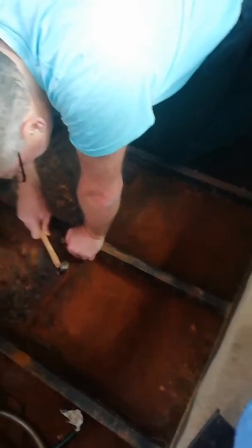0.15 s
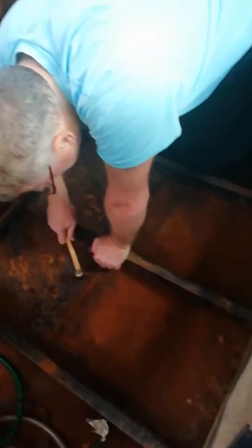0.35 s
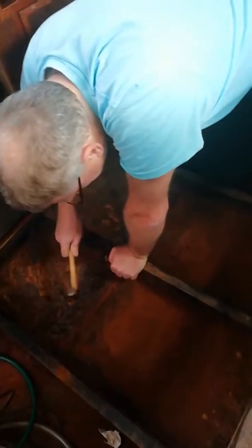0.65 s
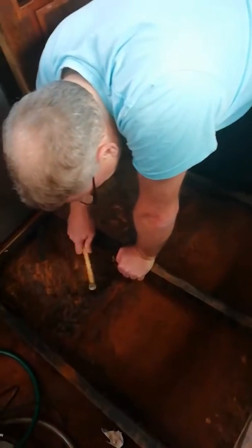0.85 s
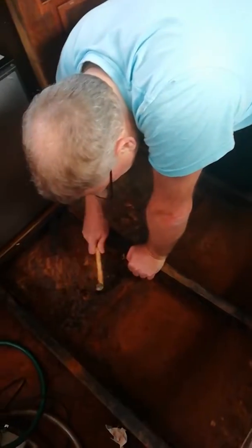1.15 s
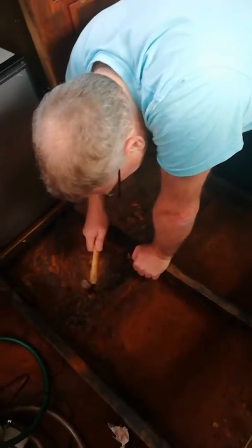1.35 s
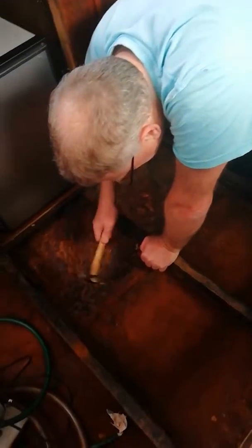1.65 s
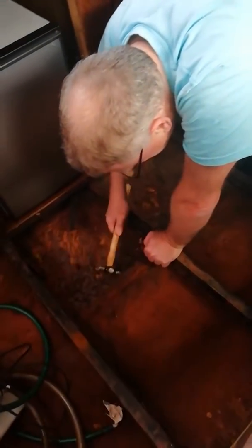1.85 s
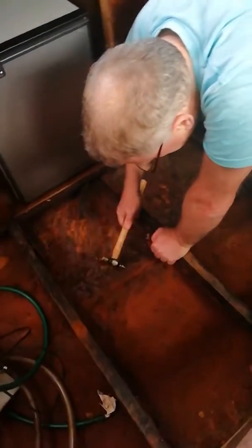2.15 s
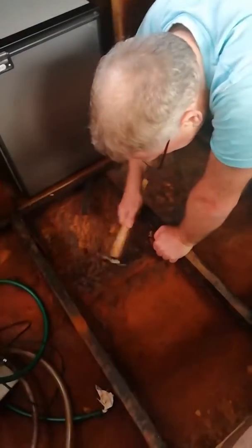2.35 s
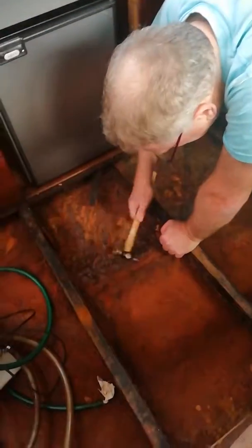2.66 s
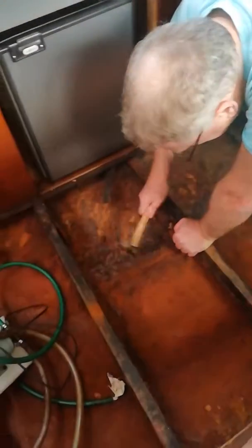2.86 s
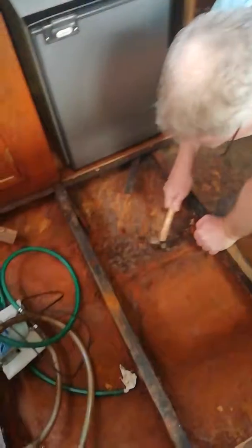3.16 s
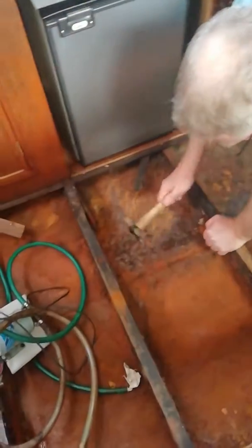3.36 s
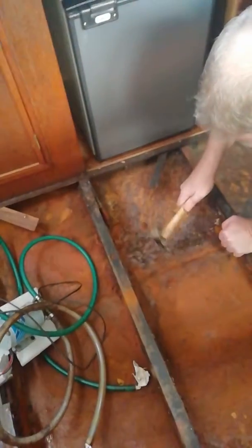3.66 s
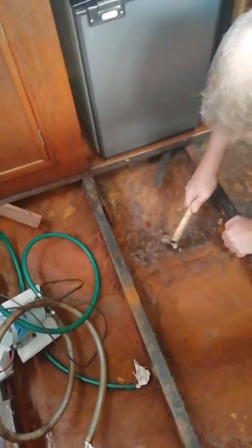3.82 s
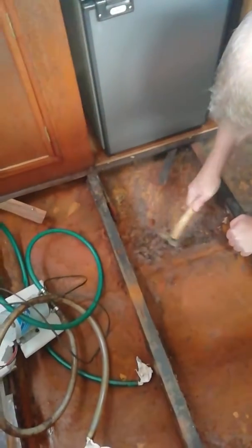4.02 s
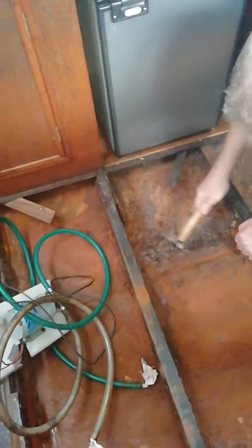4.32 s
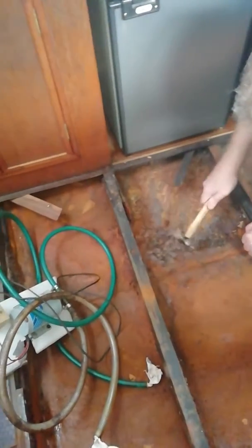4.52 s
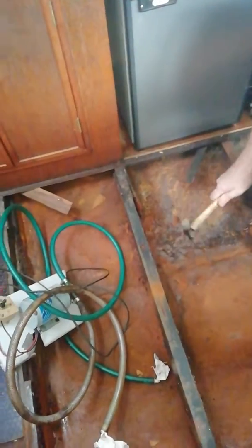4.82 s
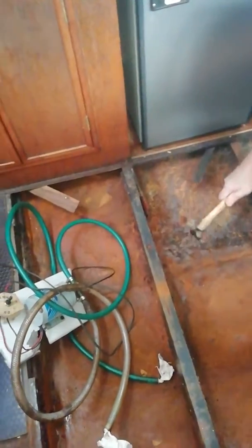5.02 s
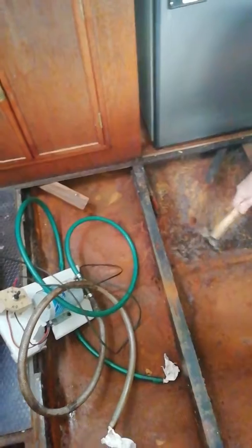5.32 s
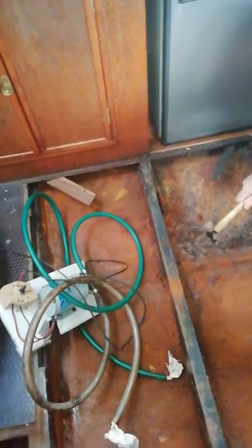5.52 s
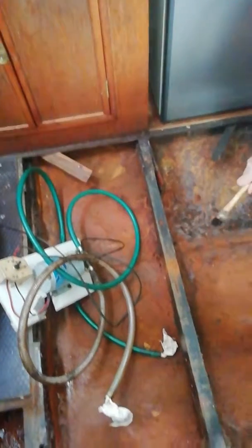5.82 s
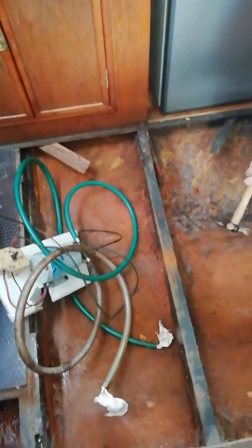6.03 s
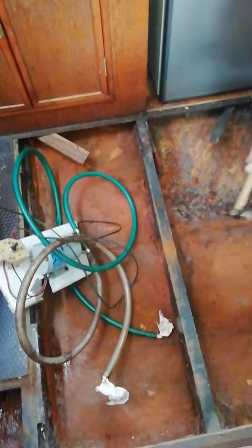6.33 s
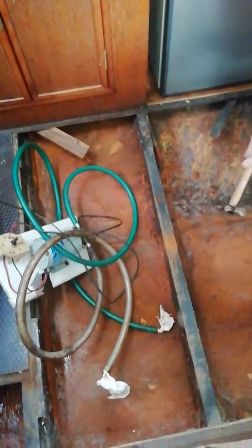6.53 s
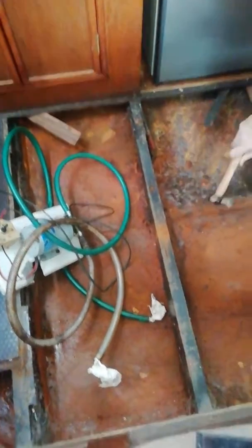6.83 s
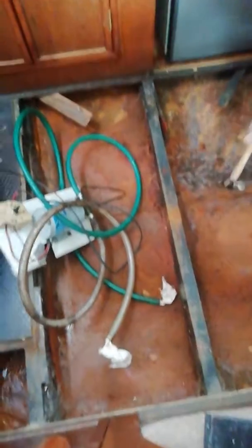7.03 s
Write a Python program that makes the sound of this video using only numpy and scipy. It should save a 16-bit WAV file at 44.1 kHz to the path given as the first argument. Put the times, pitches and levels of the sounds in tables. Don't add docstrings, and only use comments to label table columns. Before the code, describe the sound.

A small hammer chips rust from steel plating inside a boat cabin, heard close on a phone. A faint tail of an earlier blow and crumbling grit open it; the first strike lands at 0.3 s, followed by a coarse crunch and small pings around 0.4-0.5 s. After a gap, blows resume at 0.85 and 1.2 s, then fall about every 0.3 s, each a crack, short clang and dull hull thud. Grit scrapes and sprays between them, with bright flake ticks near 1.1 and 2.0 s. A hard blow stands out at 2.4 s. From 3 to 4.7 s hits are mostly softer, some with a high thin ring and scattering rust. From 4.9 s they grow firmer and cleaner, with little debris, peaking at 6.2, 6.75 and 7.0 s; a chip skitters around 6.5 s. Low rumble and quiet air lie underneath.

```python
import sys
import numpy as np
from scipy import signal
from scipy.io import wavfile
from scipy.ndimage import uniform_filter1d

SR = 44100
rng = np.random.default_rng(int(sys.argv[2]) if len(sys.argv) > 2 else 0)


def convert_level_to_amplitude(level_db):
    exponent = np.asarray(level_db, float) / 20
    return 10 ** exponent


def to_wav(sig):
    pcm = np.clip(np.atleast_2d(sig), -1, 1) * 32767
    pcm = np.round(pcm).astype(np.int16)
    wavfile.write(sys.argv[1], SR, pcm.T)


N = 316638


def rms_one(x):
    return x / np.sqrt(np.mean(x ** 2) + 1e-20)


def at_hz(points, hz):
    curve_hz, values = np.transpose(points)
    return np.interp(np.log(hz), np.log(curve_hz), values)


def clicks(seconds, sizes):
    train = np.full(N, 1e-18)
    places = np.round(np.asarray(seconds) * SR).astype(int)
    train[np.clip(places, 0, N - 1)] = sizes
    return train


def ring(train, hz, t60):
    r, w = convert_level_to_amplitude(-60 / (t60 * SR)), 2 * np.pi * hz / SR
    return signal.lfilter([0, np.sin(w)], [1, -2 * r * np.cos(w), r * r], train)


def die(train, t60):
    return signal.lfilter([1], [1, -convert_level_to_amplitude(-60 / (t60 * SR))], train)


# (frequency [Hz], correlation [-1..1])
LIKENESS = [(60, 0.97), (130, 1), (290, 0.85), (640, -0.36), (1410, 0.24), (3100, 0.011), (6820, -0.048),
            (15000, 0.034)]
# (frequency [Hz], left minus right [dB])
LEAN = [(60, 0.5), (110, 2), (200, -1.5), (380, -2.5), (700, 7), (1290, -1.5), (2380, -1), (4400, 0.5),
        (8120, 1.5), (15000, -2.5)]


def stereo_bands():
    edges = 30 * 2 ** np.arange(0, 9.2, 1 / 3)
    white = rng.standard_normal((2, 2, N))
    for k, (low, high) in enumerate(zip(edges, edges[1:])):
        band = signal.butter(2, [low, high], "band", fs=SR, output="sos")
        mid, side = signal.sosfilt(band, white[k % 2])
        hz = np.sqrt(low * high)
        alike = np.clip(at_hz(LIKENESS, hz), -1, 1)
        lean = convert_level_to_amplitude(at_hz(LEAN, hz) / 2 * np.array([[1], [-1]]))
        yield hz, lean * (np.sqrt(1 + alike) * mid + np.sqrt(1 - alike) * side * [[1], [-1]])


EARLIER_BLOW = [
    (0, -33, 6.4, 7, -8),
]
# (time [s], plate peak [dB], then thud, body and crack [dB over the plate])
BLOWS = [(0.289, -13, -4.5, 8, -6), (0.8446, -15, -6.5, -5, 2), (1.1992, -11.5, -6, -0.5, -6.5),
         (1.5355, -10.5, -7.5, -2, -4.5), (1.8384, -12.5, -4, -2.5, -9), (2.1191, -17.5, -2.5, -3, -1.5),
         (2.405, -5, -19.5, -13.5, -11), (2.678, -15.5, -4, 5.5, -8.5), (2.9348, -12, -7.5, -0.5, -9),
         (3.1711, -18.5, -1.5, -0.5, -13), (3.5314, -12.5, -3.5, -2, -2.5), (3.7992, -21, 2.5, 2.5, 3),
         (4.0648, -15, -9, -10, 3), (4.361, -14.5, -7, -18, -10), (4.6678, -18.5, 2, -1, -6.5),
         (4.9109, -8, -9, -11.5, -12.5), (5.1376, -9, -10, -12, -7.5), (5.3666, -8.5, -15.5, -15, -8.5),
         (5.6331, -8, -6.5, -6, -8.5), (5.928, -16, -4.5, -11.5, -5.5), (6.228, -3.5, -17, -14.5, -14),
         (6.4833, -11.5, -18, -11, -8.5), (6.7451, 1, -22, -17.5, -10), (7.016, -0.5, -25, -14.5, -14.5)]


def strike_db(hz):
    strike_hz = [230, 750, 1900, 5000, 11000]
    s, plate, thud, body, crack = np.transpose(EARLIER_BLOW + BLOWS)
    splash = crack - 0.65 * np.maximum(plate, -20)
    colours = np.stack([thud, body, 0 * plate, crack, splash], axis=1)
    colours = colours - colours.mean(axis=0)
    return plate + np.array([np.interp(np.log(hz), np.log(strike_hz), row) for row in colours])


# (frequency [Hz], level [dB per Hz])
PLATE = [(50, -74.5), (85, -30.5), (150, -8.5), (280, -1.5), (540, -5), (1100, -5.5), (1750, -12),
         (2800, -16.5), (4200, -22), (6500, -27), (9000, -25.5), (12000, -33), (16500, -33)]
# (frequency [Hz], t60 [s])
PLATE_T60 = [(60, 0.2), (160, 0.33), (420, 0.21), (1100, .17), (2900, .14), (7700, 0.15), (14000, 0.047)]
# (frequency [Hz], level [dB per Hz])
AIR = [(200, -9), (300, -3.5), (500, -7.5), (1500, -4.5), (2400, -13.5), (3000, -7.5), (6500, -17.5),
       (9000, -19), (12000, -16), (16500, -12)]


def plate_and_air(seconds):
    air_db = -69.5
    plate, air = 0, 0
    for hz, band in stereo_bands():
        blow_db = strike_db(hz) + at_hz(PLATE, hz) + rng.normal(0, 1.5, len(seconds))
        train = clicks(seconds, convert_level_to_amplitude(blow_db))
        t60 = at_hz(PLATE_T60, hz)
        swell = die(train, t60) - die(train, 12.0 / hz)
        crack = convert_level_to_amplitude(3) * np.clip(hz / 1500, 0, 1) * die(train, .018)
        long_tail = convert_level_to_amplitude(-33.5) * die(train, 1.3 * t60)
        plate = plate + (crack + swell + long_tail) * band
        air = air + convert_level_to_amplitude(at_hz(AIR, hz)) * band
    return convert_level_to_amplitude(14) * plate + convert_level_to_amplitude(air_db) * rms_one(air)


def struck(modes, seconds, level_db, spread_db):
    out = np.zeros((2, N))
    for hz, mode_db, t60 in modes:
        chance = rng.normal(0, 1, (len(seconds), 2))
        sizes = convert_level_to_amplitude(level_db(hz) + mode_db + spread_db * chance[:, 0]) * np.sign(chance[:, 1])
        tone = ring(clicks(seconds, sizes), hz, t60)
        phase = np.arccos(np.clip(at_hz(LIKENESS, hz), -1, 1))
        lag = int(phase / (2 * np.pi * hz) * SR)
        out += [tone, np.roll(tone, lag)]
    return out


# (frequency [Hz], level [dB], t60 [s])
HULL = [(86.4, -17, 0.54), (124.74, -12.5, 0.4), (156.5, -11, 0.12), (214.3, 2.5, 0.15), (274.3, -7, 0.41),
        (303, -8.5, 0.28), (361.4, -1, 0.13), (400, -4.5, .24), (472, -1.5, 0.15), (549, -4.5, .18),
        (686, -11, .15), (910, -13, .13), (1160, -11, .13), (1380, -34, 0.05), (1606, -15, 0.24),
        (1803, -5, 0.11)]


def hull_thud(seconds):
    thud = struck(HULL, seconds, lambda hz: strike_db(hz) - 7, spread_db=1.78)
    return signal.sosfilt(signal.butter(3, 85, "high", fs=SR, output="sos"), thud)


# (time [s], level [dB])
RUMBLE = [(0.0, -53.5), (0.42, -58.5), (0.6, -71.5), (0.86, -66.5), (1.04, -49), (2.56, -55.5),
          (3.16, -50.5), (3.38, -63), (3.56, -61.5), (3.72, -51.5), (4.5, -60.5), (4.9, -50), (6.2, -60.5),
          (7.18, -55)]


def rumble():
    s, level_db = np.transpose(RUMBLE)
    low_band = signal.butter(2, [28, 130], "band", fs=SR, output="sos")
    dull = signal.sosfilt(low_band, rng.standard_normal(N))
    return convert_level_to_amplitude(np.interp(np.arange(N) / SR, s, level_db)) * rms_one(dull)


# (time [s], grit level [dB], time to fall 30 dB [s], coarseness [dB])
SHOWERS = [(0.0, -39.5, 0.16, 2.5), (.134, -38, 0.04, 5), (.33, -39.5, .2, 1), (.4, -32.5, 0.1571, 7.5),
           (.5, -34, 0.1048, 8.5), (.88, -40, 0.18, 8.5), (1.14, -30.5, 0.19, 1.5), (1.25, -43, 0.17, 2),
           (1.468, -36, 0.17, 3), (1.537, -20.5, 0.02, -16), (1.88, -32, 0.0245, 4), (2.17, -43, 0.09, 6.5),
           (2.315, -45, 0.18, -12), (3.14, -53.5, 0.22, 0), (3.2, -36.5, 0.0266, 12.5),
           (3.58, -53, 0.28, 3), (3.85, -35.5, 0.04, 10), (4.135, -38, 0.0355, 12.5),
           (4.38, -35.5, 0.22, 8.5), (4.572, -60, -0.16, -6.5), (5.61, -48.5, -0.08, -4.5),
           (5.68, -49, 0.07, 18.5), (5.758, -55, 0.17, 6.5), (5.98, -54, 0.17, 6), (6.13, -60, 0.5, -5),
           (1.705, -45, 1, -8), (6.52, -41.5, 0.17, 7.5), (6.82, -52, 0.1, -9), (.94, -36, 0.13, -4.5),
           (7.093, -34, 0.22, -6)]
DRAGS = [(.47, -39, .1, 8.5), (.99, -38.5, 0.08, -1), (1.19, -31, 0.04, -7.5), (1.74, -47.5, 0.02, -3.5),
         (2.0, -31.5, 0.13, -8.5), (2.1, -42.5, 0.13, -17), (2.586, -66.5, 0.6, -7),
         (2.75, -48.5, 0.14, -5), (6.39, -59.5, 0.5, -10), (6.44, -48, 0.25, -8.5), (6.726, -48, 0.07, -12),
         (6.926, -56, .15, -7)]
# (frequency [Hz], level [dB per Hz])
GRIT = [(150, -37), (300, -1.5), (500, -8.5), (1000, -6), (1600, -11), (3000, -14.5), (6000, -13.5),
        (9000, -9.5), (12000, -14.5), (16500, -28)]


def grit():
    t, fine, coarse = np.arange(N) / SR, np.zeros(N), np.zeros(N)
    for rows, rise_db_per_s in [(SHOWERS, 2000), (DRAGS, 350)]:
        for s, level_db, fall_s, coarse_db in rows:
            near = slice(max(int((s - .3) * SR), 0), int((s + 3 * fall_s) * SR))
            after = t[near] - s
            shape = convert_level_to_amplitude(level_db - np.maximum(-rise_db_per_s * after, 30 * after / fall_s))
            fine[near] += shape
            coarse[near] += shape * convert_level_to_amplitude(coarse_db)
    sizes = convert_level_to_amplitude(4.1 * np.minimum(rng.exponential(1, N), 5)) * rng.choice([-1, 1], N)
    born = rng.random(N) < 2500 / SR
    dealt = rng.integers(0, 24, N)
    low, high = np.zeros((2, N))
    for k, hz in enumerate(np.geomspace(200, 15500, 24)):
        train = sizes * born * (dealt == k) + 1e-18
        grains = convert_level_to_amplitude(at_hz(GRIT, hz)) * hz * ring(train, hz, 4.8 / hz)
        if hz < 4000:
            low = low + grains
        else:
            high = high + grains
    scale = convert_level_to_amplitude(-7.5) / np.std(high)
    return scale * (fine * high + coarse * low)


# (time [s], peak [dB], pitch [Hz])
FLAKES = [(0.1293, -19.5, 1630), (1.1437, -8, 4020), (1.4682, -25, 1870), (1.9844, -21, 7390),
          (1.999, -9, 8150), (2.3161, -37.5, 7360), (2.9098, -31, 1740), (3.1445, -27, 1510),
          (4.1352, -13, 5380), (4.573, -37, 2670), (5.5575, -40, 7200), (5.6096, -29.5, 2480),
          (5.7573, -39, 3780), (6.1295, -44, 7420), (6.3809, -34, 2290), (6.4184, -16.5, 6840),
          (6.6085, -21, 6700), (6.6807, -28.5, 6440), (6.706, -17.5, 2660), (6.934, -36.5, 6460),
          (7.0936, -14, 7420)]


def flakes():
    out = np.zeros(N)
    for s, level_db, hz in FLAKES:
        tick = clicks([s], convert_level_to_amplitude(level_db))
        out += convert_level_to_amplitude(-13.5) * ring(tick, hz, 10.0 / hz) + convert_level_to_amplitude(-6.5) * ring(tick, 7000, 0.0017)
    return out


HEAD_HZ = [5330, 7450, 11280, 11345, 13510]
# (level [dB], t60 [s])
HEAD_RING = [(-20, .12), (-8, .1), (3, .22), (-2, .12), (-12, .1)]
HEAD_DB = [-70, -60, -46, -56, -46, -54, -50, -50, -37, -36, -44, -58, -43, -29, -44, -56, -54, -60, -60,
           -62, -62, -40, -58, -46, -56]


def hammer_head(seconds):
    modes = [(hz, *ringing) for hz, ringing in zip(HEAD_HZ, HEAD_RING)]
    return struck(modes, seconds, lambda hz: np.array(HEAD_DB), spread_db=1.5)


# (upper clank level [dB], upper clank pitch [Hz], lower clank level [dB], lower clank pitch [Hz])
CLANKS = [(-18, 2900, -21, 1786), (-26, 8000, -15.5, 1710), (-15, 2600, -9.5, 1717), (-17, 3140, -22, 2700),
          (-18.5, 4000, -14.5, 1680), (-25.5, 2000, -21.5, 1776), (-19, 2654, -9, 1786),
          (-25.5, 6200, -25, 2100), (-18, 3610, -13, 1700), (-52, 2800, -21, 1380),
          (-11.5, 4100, -17, 1726), (-10, 3420, -33, 1100), (-12, 3550, -19, 2100),
          (-19, 2970, -23.5, 1500), (-36, 4500, -28, 1500), (-11, 2600, -14.5, 1733),
          (-14, 2320, -17, 1710), (-25.5, 3750, -23, 2100), (-11.5, 4700, -33, 1380),
          (-22, 3000, -20, 1792), (-11, 4900, -9.5, 1807), (-15, 5900, -15, 1895),
          (-15.5, 3090, -13.5, 2200), (-10, 3400, -7, 1770)]


def clank():
    out, t = np.zeros((2, N + SR)), np.arange(SR // 5) / SR
    weights = np.array([[1, 0.21, 0.48], [1.0, -1.4, 0.36]])
    for (s, *_), (upper_db, upper_hz, lower_db, lower_hz) in zip(BLOWS, CLANKS):
        start = round(s * SR)
        for hz, level_db, t60 in [(upper_hz, upper_db - 10, .05), (lower_hz, lower_db - 2.0, .09)]:
            cluster = hz * np.array([[1], [1.07], [1.36]])
            tones = convert_level_to_amplitude(level_db - 60 * t / t60) * np.sin(2 * np.pi * cluster * t)
            out[:, start:start + len(t)] += weights @ tones
    return out[:, :N]


# (time [s], level [dB], pitch [Hz], t60 [s])
CHIPS = [
    (.415, -43, 5370, .08),
    (.455, -45, 2700, .05),
    (.5, -41.5, 5310, 0.11),
    (4.131, -45.5, 5310, 0.17),
    (4.575, -70.5, 2610, .04),
    (4.82, -62.5, 1470, 0.12),
    (5.83, -65.5, 1360, 0.22),
    (6.555, -37.5, 2260, 0.05),
    (6.95, -63, 1330, 0.18),
]


def chips():
    out = np.zeros(N)
    for s, level_db, hz, t60 in CHIPS:
        for detune in (.991, 1, 1.006):
            out += ring(clicks([s], convert_level_to_amplitude(level_db)), hz * detune, t60)
    return out


def cabin(x, wet_db):
    t60 = 0.09
    t = np.arange(SR // 3) / SR
    tail = rng.standard_normal((2, len(t))) * convert_level_to_amplitude(-60 * t / t60) * (t > .002)
    tail = convert_level_to_amplitude(wet_db) * tail / np.sqrt(np.sum(tail ** 2, axis=1, keepdims=True))
    return x * [[.9], [.5]] + signal.fftconvolve(x[None], tail, axes=1)[:, :N]


def microphone(x):
    peak_hz, peak_width_hz, peak_db = 8780, 854, 13.5
    top_hz, low_hz = 10060, 38.7
    r, w = np.exp(-np.pi * peak_width_hz / SR), 2 * np.pi * peak_hz / SR
    peak = signal.lfilter((1 - r * r) / 2 * np.array([1, 0, -1]), [1, -2 * r * np.cos(w), r * r], x)
    x = signal.sosfilt(signal.butter(2, top_hz, fs=SR, output="sos"), x + convert_level_to_amplitude(peak_db) * peak)
    x = signal.sosfilt(signal.butter(10, 16000, fs=SR, output="sos"), x)
    return signal.sosfilt(signal.butter(3, low_hz, "high", fs=SR, output="sos"), x)


def limiter(x):
    limit_db, release_db_per_s = -3, 212
    release = release_db_per_s * np.arange(N) / SR
    over = np.maximum(20 * np.log10(np.abs(x).max(axis=0) + 1e-9) - limit_db, 0)
    held = np.maximum.accumulate(over + release) - release
    cut = uniform_filter1d(np.append(held[44:], np.zeros(44)), size=88)
    return np.clip(x * convert_level_to_amplitude(-.7 * cut), -1, 1)


def scene():
    seconds = np.array(EARLIER_BLOW + BLOWS)[:, 0]
    blows = plate_and_air(seconds) + hull_thud(seconds) + hammer_head(seconds) + clank()
    debris = cabin(grit(), wet_db=4.5) + cabin(flakes() + chips(), wet_db=-2)
    return blows + rumble() + debris


def top_cut(x):
    return signal.sosfilt(signal.butter(12, 16820, fs=SR, output="sos"), x)


def record(dry):
    mix = limiter(microphone(dry))
    return top_cut(mix)


dry = scene()
out = record(dry)
to_wav(out)
```